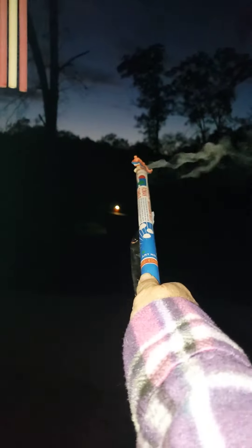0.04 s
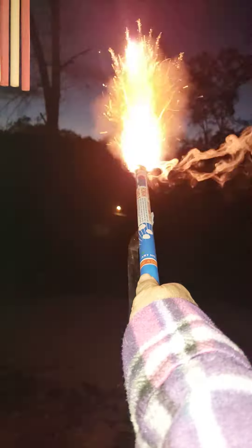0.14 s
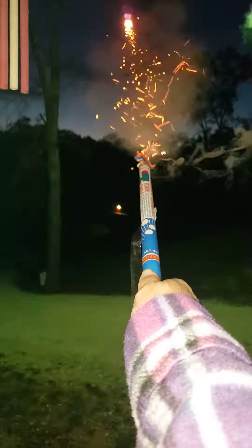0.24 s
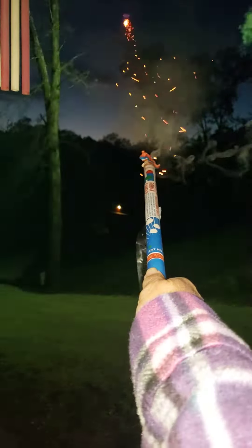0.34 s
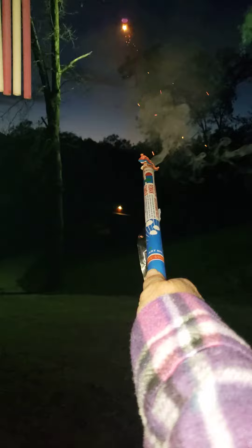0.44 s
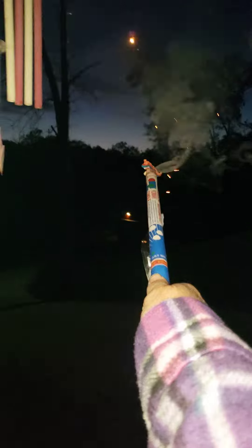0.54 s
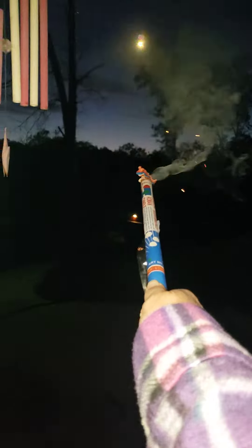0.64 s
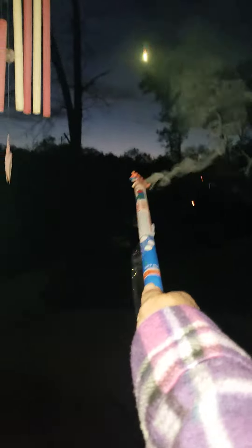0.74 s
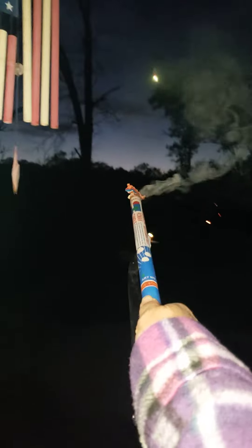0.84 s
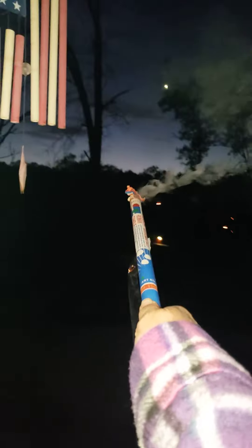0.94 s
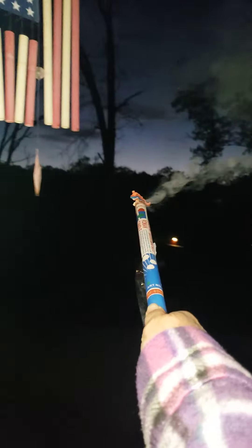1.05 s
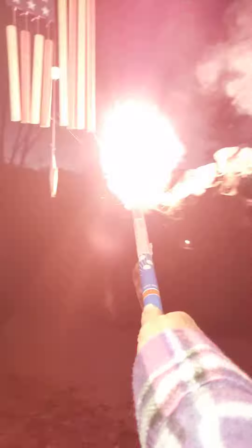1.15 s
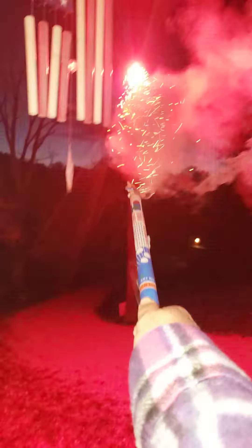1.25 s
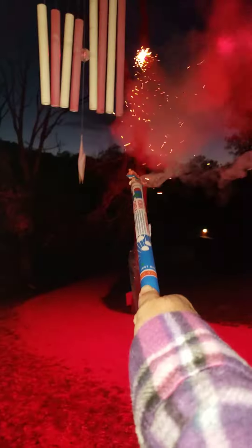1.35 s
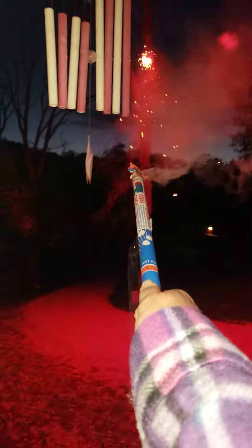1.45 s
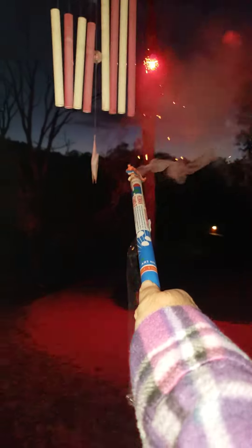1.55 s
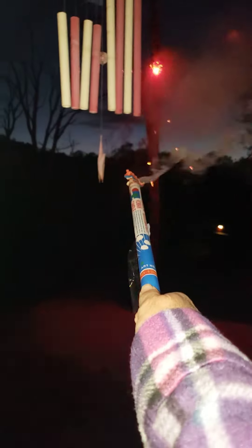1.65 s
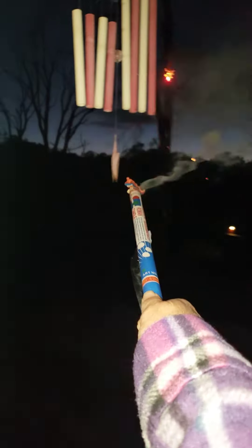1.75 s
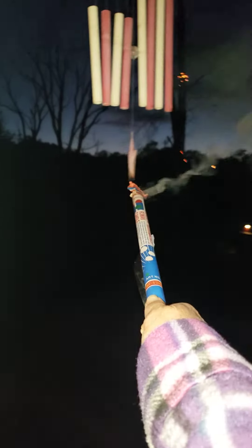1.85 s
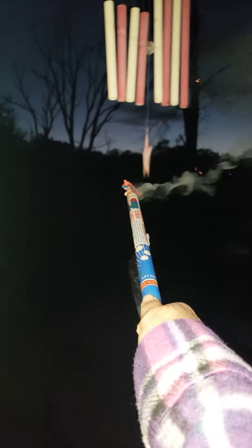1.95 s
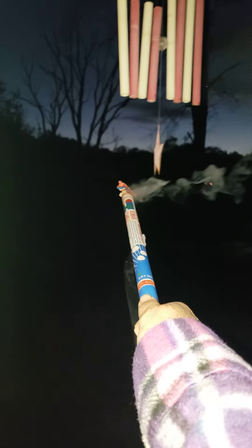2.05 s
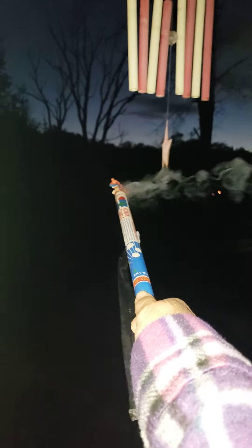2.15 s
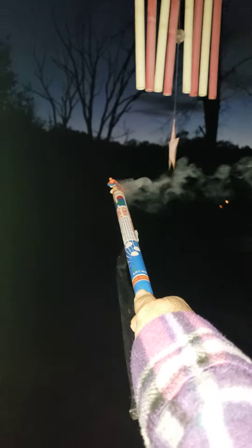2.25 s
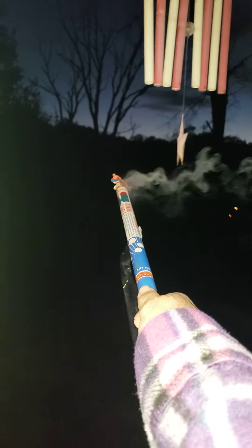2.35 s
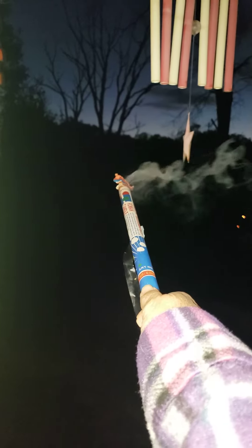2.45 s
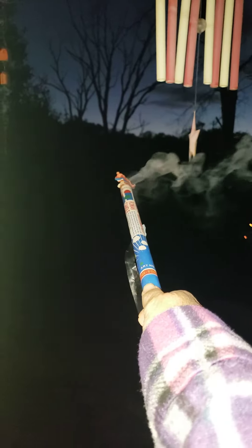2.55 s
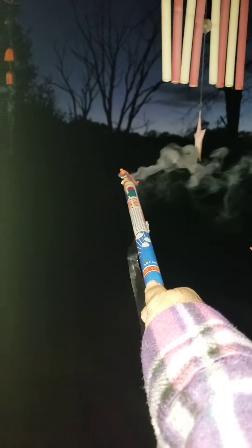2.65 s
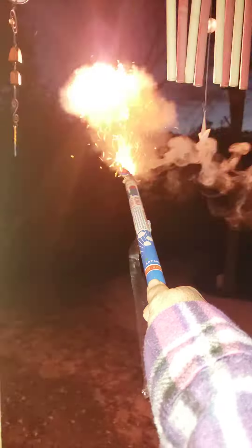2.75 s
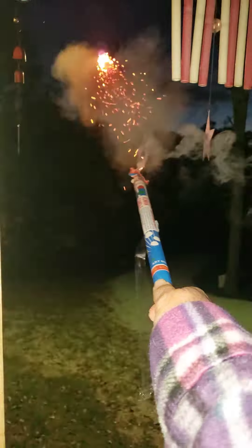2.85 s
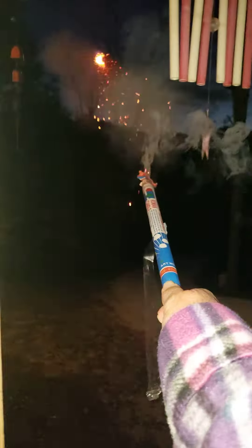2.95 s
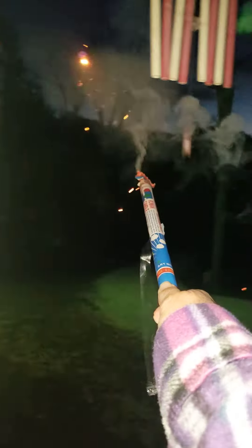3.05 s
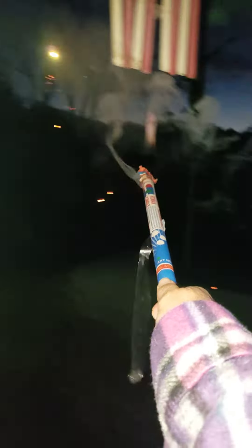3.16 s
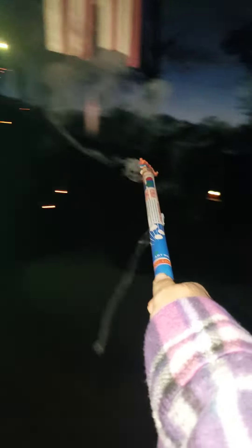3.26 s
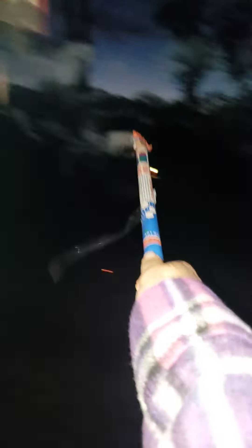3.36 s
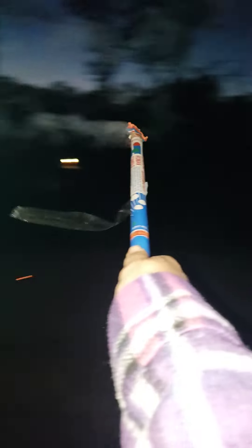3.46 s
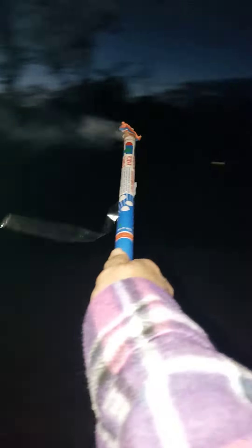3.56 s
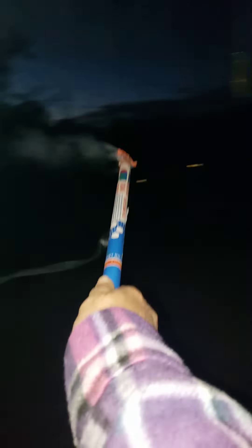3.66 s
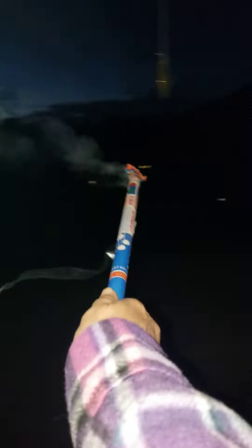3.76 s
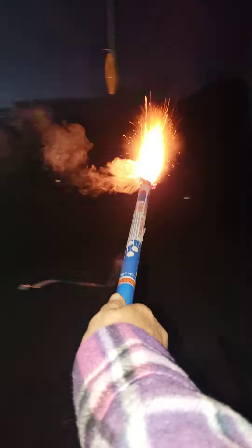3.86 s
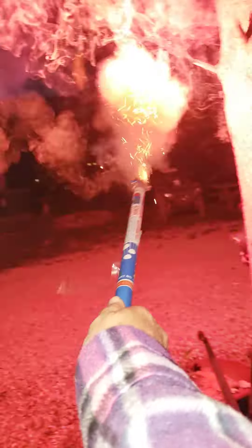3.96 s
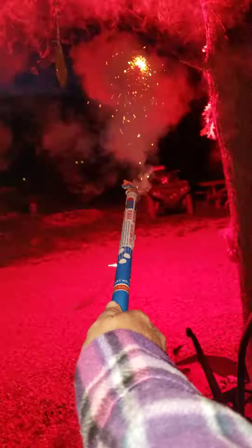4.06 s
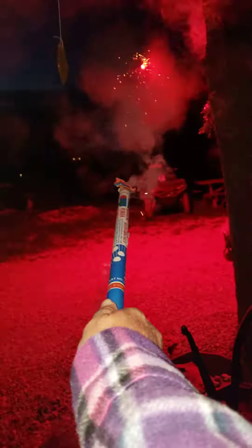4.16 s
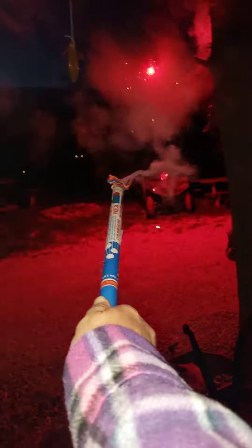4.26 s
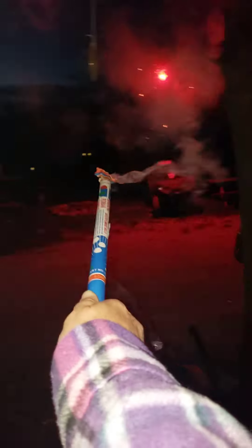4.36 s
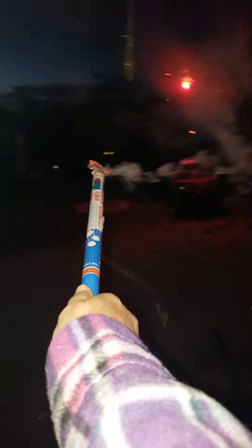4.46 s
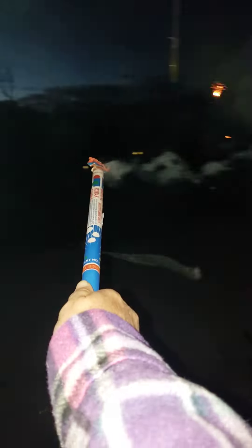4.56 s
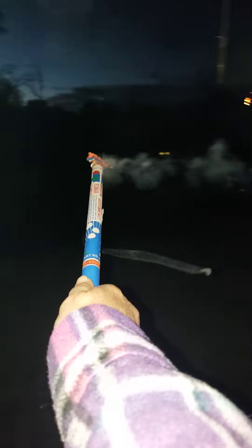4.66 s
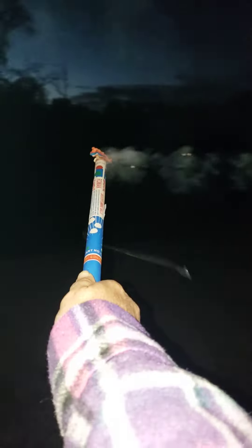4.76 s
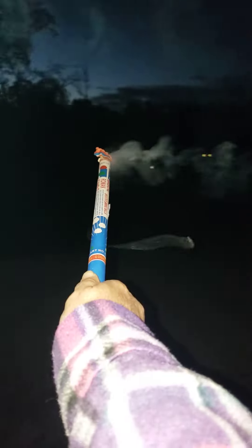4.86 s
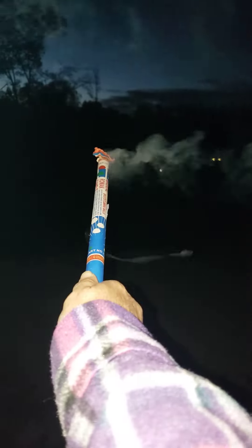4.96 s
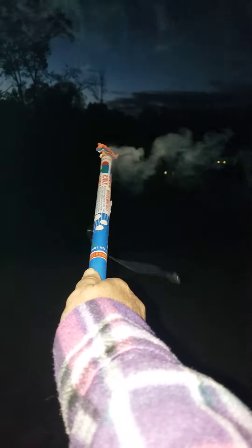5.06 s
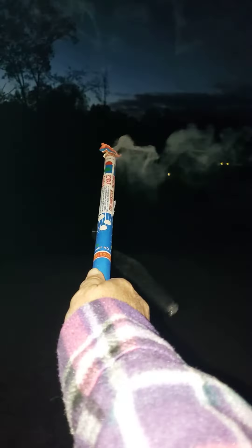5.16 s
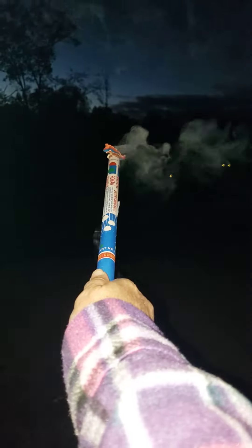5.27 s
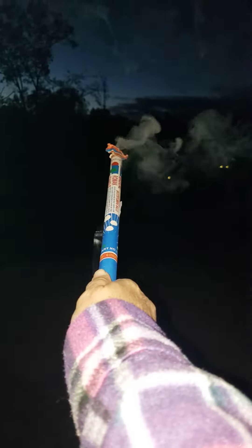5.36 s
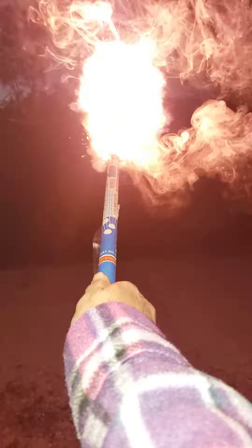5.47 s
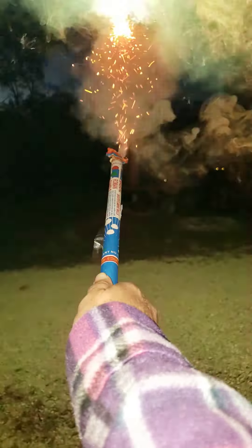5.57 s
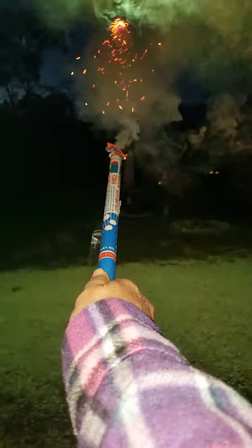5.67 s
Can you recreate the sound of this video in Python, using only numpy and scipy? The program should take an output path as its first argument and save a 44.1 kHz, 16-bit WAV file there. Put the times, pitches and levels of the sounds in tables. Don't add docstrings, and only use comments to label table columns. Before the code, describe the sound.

A handheld firework tube hisses steadily outdoors at night and fires five sharp, booming pops at uneven intervals, each with a short echo.

```python
import sys
import numpy as np
from scipy import signal
from scipy.fft import rfft, irfft, next_fast_len
from scipy.io import wavfile

SR = 44100
rng = np.random.default_rng(int(sys.argv[2]) if len(sys.argv) > 2 else 0)


def to_wav(s):
    ch = np.atleast_2d(s).T
    pcm = np.round(np.clip(ch, -1, 1) * 32767)
    wavfile.write(sys.argv[1], SR, pcm.astype(np.int16))


def invert_db(x):
    u = np.asarray(x, float) / 20
    return 10 ** u


N = 252711
TIME_S = np.arange(N) / SR
SIDE = np.array([[.5], [-.5]])

# ignition_s, jet_open_s, ball_out_s
SHOTS = [
    (.1655, .1735, .1830),
    (1.1610, 1.1715, 1.1920),
    (2.7160, 2.7260, 2.7500),
    (3.8925, 3.9020, 3.9260),
    (5.4460, 5.4565, 5.4825),
]
# frequency_hz, left_right_db
PORT_SHADING = [(60, -1.5), (300, -2), (700, .5), (1300, -4), (2400, -4), (4400, -3.5), (8000, 5.5),
                (13000, 4.5)]


def at_hz(points, hz):
    corner_hz, value = np.transpose(points)
    return np.interp(np.log(np.maximum(hz, 1)), np.log(corner_hz), value)


def in_time(rows):
    s, value = np.transpose(rows)
    return np.interp(TIME_S, s, value)


def swells(rows):
    return sum(db * np.cos(np.pi * np.clip((TIME_S - s) / length, -.5, .5)) ** 2 for s, length, db in rows)


def gate(start, end, fade):
    outside = np.maximum(np.maximum(start - TIME_S, TIME_S - end), 0)
    return invert_db(-30 * outside / fade)


def rms_one(x):
    return x / np.sqrt(np.mean(x ** 2) + 1e-20)


def band(x, order, hz, kind):
    return signal.sosfiltfilt(signal.butter(order, hz, kind, fs=SR, output="sos"), x)


def noise(spectrum, channels=1):
    size = next_fast_len(N)
    hz = np.fft.rfftfreq(size, 1 / SR)
    white = rfft(rng.standard_normal((channels, size)))
    return rms_one(irfft(white * invert_db(at_hz(spectrum, hz)), size)[:, :N])


def drift(rate):
    r = np.exp(-2 * np.pi * rate / SR)
    return rms_one(signal.lfilter([1], [1, -2 * r, r * r], rng.standard_normal(N + SR))[SR:])


def resonant_noise(hz, width_hz, narrow):
    white = rng.standard_normal((3, N)) + 1j * rng.standard_normal((3, N))
    turn = np.exp(2j * np.pi * np.cumsum(hz) / SR)

    def ring(width):
        r = np.exp(-np.pi * width / SR)
        return rms_one((signal.lfilter([1], [1, -2 * r, r * r], white) * turn).real)

    narrow = np.clip(narrow, 0, 1)
    return (1 - narrow) * ring(width_hz) + narrow * ring(width_hz / 3)


def ports(x, pan_db):
    # frequency_hz, level_db
    scattered = [(100, -36), (500, -6.5), (1200, -4), (4000, 0.5), (10000, 5.5)]
    lag_s = 0.00013
    size = next_fast_len(N)
    hz = np.fft.rfftfreq(size, 1 / SR)
    x = rfft(x, size)
    direct = x[0] * np.exp(2j * np.pi * hz * SIDE * lag_s)
    both = direct + x[1:] * invert_db(at_hz(scattered, hz))
    return irfft(both * invert_db(SIDE * at_hz(PORT_SHADING, hz)), size)[:, :N] * invert_db(SIDE * pan_db)


def blast(s, db, push_ms, soft):
    u = np.arange(2000) / SR / (push_ms / 1000)
    rounding = np.hanning(3 + int(soft * push_ms / 1000 * SR))
    wave = np.convolve((1 - u) * np.exp(-.7 * u), rounding)[:2000]
    out, at = np.zeros(N), round(s * SR)
    out[at:at + 2000] = invert_db(db) * wave / wave.max()
    return out


def vigour():
    # time_s, level_db
    burn_rate = [(0.0, -66.5), (0.4, -68), (1.0, -71), (1.17, -72.5), (1.32, -68.5), (1.84, -67),
                 (2.14, -71.5), (2.46, -69), (2.6, -66.5), (2.9, -63.5), (3.3, -63.5), (3.85, -64.5),
                 (4.06, -59.5), (4.45, -62), (5.27, -67.5), (5.45, -68.5), (5.73, -61.5)]
    return in_time(burn_rate)


def vigour_swing():
    return vigour() - vigour().mean()


def stall():
    start, end = 2.322, 2.454
    return in_time([(start - .01, 0), (start, 1), (end - .004, 1), (end, 0)])


def afterglow():
    decay_s = 0.26
    return sum((TIME_S > out) * np.exp(-np.maximum(TIME_S - out, 0) / decay_s) for _, _, out in SHOTS)


def spark_showers():
    # middle_s, length_s, level_db
    showers = [
        (0, .2, -12),
        (.5, 0.51, 0.5),
        (1.05, 0.45, -6.5),
        (2.05, 0.76, 2),
        (3.5, 1, 3.5),
        (3.89, 0.34, -2),
        (4.2, 1, -3),
        (4.7, 0.93, 2.5),
        (5.3, 1, 3),
    ]
    return swells(showers)


def night_murmur():
    # frequency_hz, density_db
    murmur = [(25, -9), (60, -10), (120, -9.5), (220, -2.5), (350, -6), (600, -11), (1500, -15.5),
              (5000, -34)]
    # middle_s, length_s, level_db
    gusts = [
        (0, 0.9, 6),
        (.68, .2, 4),
        (1.99, 0.41, -5),
        (2.55, 0.18, 6),
        (3.53, 0.41, 9.5),
        (3.87, 0.32, -8),
        (4.6, 0.69, 4),
    ]
    level_db = -71 + 0.21 * vigour_swing() + 6.5 * afterglow() + swells(gusts)
    own, shared = noise(murmur, channels=2), noise(murmur)
    return (0.61 * own + 1.25 * shared) * invert_db(level_db + 2.0 * drift(16.0) + np.array([[-2.5], [2.5]]))


def far_hum():
    # start_s, end_s, pitch_hz, width_hz, level_db
    hums = [(0.606, 0.658, 180, 25, -65.5), (1.875, 1.97, 445, 24.8, -71), (2.3, 2.5, 429, 25, -71.5),
            (3.247, 3.35, 320, 25, -70)]
    return sum(resonant_noise(np.full(N, hz), width_hz, 0)[0] * invert_db(db) * gate(start, end, 0.051)
               for start, end, hz, width_hz, db in hums)


def far_thud():
    thud = blast(2.3625, db=-41.5, push_ms=0.76, soft=4.0)
    return signal.sosfilt(signal.butter(2, 70, "high", fs=SR, output="sos"), thud)


def rim_whistles():
    # start_s, end_s, pitch_hz, width_hz, level_db
    edge_tones = [(0.647, 0.73, 2870, 450, -69), (1.447, 1.762, 3000, 563, -69),
                  (4.05, 4.33, 3620, 150, -69), (4.48, 4.928, 3024, 504, -60)]
    out = 0
    for start, end, hz, width_hz, db in edge_tones:
        arch_db = swells([((start + end) / 2, end - start, 5)])
        out = out + invert_db(db + arch_db) * gate(start, end, .06) * resonant_noise(np.full(N, hz), width_hz, 0)
    return out


def spark_sizzle():
    # frequency_hz, density_db
    crackle = [(3000, -14.5), (5500, -3), (7000, -5), (8300, -8.5), (11000, -3.5), (13500, -8.5),
               (15500, -3.5)]
    showers_db = spark_showers()
    level_db = -62 + 0.46 * vigour_swing() + showers_db - 6 * stall()
    sizzle = noise(crackle, channels=2) * invert_db(level_db + .6 * drift(20) + np.array([[1.7], [-1.7]]))
    coarse = band(sizzle, 2, 8500, "low")
    return sizzle + (invert_db(0.76 * showers_db) - 1) * coarse


def free_hiss():
    # frequency_hz, density_db
    mixing = [(300, -35), (900, -11), (1400, -4), (2800, -0.5), (4500, -4), (6500, -15.5), (9000, -19.5),
              (16000, -26)]
    level_db = -63 + 0.87 * vigour_swing() + 0.5 * afterglow() + 0.31 * spark_showers() - 10 * stall()
    return noise(mixing, channels=3) * invert_db(level_db + 1.4 * drift(36))


def tube_column():
    modes = [(.305, 404, -1), (1.0, 528, 1.5), (1.69, 542, -6.5), (2.352, 586, -15.5), (3.0, 684, -22.5)]
    start_hz, growth_per_s = 2626, .072
    leap = invert_db(swells([(3.6, .3, .5)]))
    column_hz = start_hz * leap / (1 + growth_per_s * TIME_S)
    narrow = 0.21 * (TIME_S - 2.3)
    ringing = sum(invert_db(db + drift(5)) * resonant_noise(k * column_hz, width_hz, narrow)
                  for k, width_hz, db in modes)
    return ringing * invert_db(vigour() - 10 * stall() + 0.5 + 0.85 * drift(36))


def burn():
    # time_s, left_right_db
    aim = [(0, -2.5), (.5, 0), (1.0, -4.5), (1.3, 0), (2.4, -3), (2.9, -0.5), (5.73, 0.5)]
    return ports(tube_column() + rim_whistles() + free_hiss(), in_time(aim)) + spark_sizzle()


def echoes(x):
    # frequency_hz, t60_s
    decay = [(55, 0.69), (110, .3), (200, 0.31), (600, 0.23), (2000, 0.24), (5000, 0.19), (12000, 0.2)]
    # frequency_hz, level_db
    colour = [(50, -13.5), (200, -7.5), (600, -2.5), (2000, -5), (5000, -0.5), (12000, 0)]
    t, edges = np.arange(SR) / SR, 40 * 2 ** np.arange(0, 9.1, .5)
    white = rng.standard_normal((2, 3, SR))
    tail = 0
    for k, (low, high) in enumerate(zip(edges, edges[1:])):
        sos = signal.butter(2, [low, min(high, .45 * SR)], "band", fs=SR, output="sos")
        mid, *own = signal.sosfilt(sos, white[k % 2])
        hz = np.sqrt(low * high)
        alike = 1 / (1 + (hz / 900) ** 2)
        t60_s = at_hz(decay, hz)
        dying = invert_db(-60 * t / t60_s) + invert_db(-23.0 - 60 * t / (2.97 * t60_s))
        shade = invert_db(SIDE * at_hz(PORT_SHADING, hz) + at_hz(colour, hz))
        clumps = invert_db(2.1 * drift(44)[:SR])
        tail = tail + shade * clumps * dying * (np.sqrt(alike) * mid + np.sqrt(1 - alike) * np.array(own))
    tail = tail * np.minimum(t / 0.017, 1) * invert_db(-36)
    slap_s = .062
    slap = np.interp(t, [slap_s - 1 / SR, slap_s, slap_s + 1 / SR], [0, invert_db(-19.5), 0])
    tail = tail + signal.sosfilt(signal.butter(2, [150, 560], "band", fs=SR, output="sos"), slap)
    return signal.fftconvolve(x[None], tail, axes=1)[:, :N]


def recoil_booms():
    # start_s, pitch_hz, level_db, left_right_db
    kicks = [(0.179, 64, -12.5, -6), (1.188, 110, -28.5, -0.5), (2.741, 68, -19, 4), (3.911, 60, -21.5, 0),
             (5.4700, 66, -15, 0.5)]
    rise_s, decay_db_per_s = 0.0087, 730
    out = np.zeros((2, N))
    for s, hz, db, side_db in kicks:
        late = np.maximum(TIME_S - s, 0)
        level = invert_db(db + 5.5 - decay_db_per_s * late + SIDE * side_db)
        out += (1 - np.exp(-late / rise_s)) * level * np.sin(2 * np.pi * hz * late)
    return out


def pressure_pops():
    # start_s, peak_db, push_ms
    releases = [(.1775, -4, .12), (.1779, 3, .13), (1.1668, -16, .3), (1.1879, -4, .45), (2.7311, -8, .12),
                (2.7429, -2, .45), (3.9020, -4, .2), (3.9096, -8, .2), (3.9155, -6, .12), (3.9232, -11, .5),
                (5.4565, -1, .2), (5.4726, -9, .6), (5.4774, -8, .3), (5.4813, -5, .6)]
    return sum(blast(*pop, soft=0.55) for pop in releases)


def jets():
    # frequency_hz, density_db
    turbulence = [(35, -23.5), (60, -0.5), (300, -0.5), (630, 0), (1050, -2.5), (1500, -2.5), (2450, -2),
                  (3200, -7.5), (4500, -9), (6500, -19), (8100, -27.5), (9500, -23.5), (12500, -21.5),
                  (15500, -21.5)]
    # jet_db, bass_db, middle_db, treble_db, opening_db
    charges = [
        (-19.5, 6.5, -1, 6, -2.5),
        (-17, 1.5, 0, -2, -4),
        (-16, -0.5, 0, 1, -4),
        (-15.5, 2.5, -2.5, -0.5, 1.5),
        (-13, 2, 1.5, 3.5, -6),
    ]
    # first_puff_db under the jet, left_right_db, echo_db, collapse_s
    facing = [
        (-5, -0.5, 6, 0.15),
        (-10.5, -2, -2.5, 0.088),
        (-8, 0.5, 3.5, 0.09),
        (-3, -0.5, 0.5, 0.086),
        (-11.5, 2, -1.5, 0.052),
    ]
    gas = noise(turbulence, channels=3) * invert_db(1.8 * drift(500))
    bass = band(gas, 2, 350, "low")
    middle = band(gas, 2, [300, 1300], "band")
    treble = band(gas, 2, 5000, "high")
    out, pan_db, wet_db = np.zeros((3, N)), np.zeros(N), np.zeros(N)
    for (lit, opened, free), charge, (puff_db, side_db, echo_db, collapse) in zip(SHOTS, charges, facing):
        db, bass_db, middle_db, treble_db, open_db = charge
        steps = [lit - .008, lit, lit + .006, opened - .0007, opened, free, free + collapse]
        shape = np.interp(TIME_S, steps, [-60, -36, puff_db, puff_db, open_db, 0, -60])
        fast = invert_db(treble_db + 0.33 * shape)
        coloured = gas + (invert_db(bass_db) - 1) * bass + (invert_db(middle_db) - 1) * middle + (fast - 1) * treble
        blowing = (TIME_S > steps[0]) * (TIME_S < steps[-1])
        out += invert_db(db + shape) * blowing * coloured
        onward = TIME_S > lit - .1
        pan_db[onward], wet_db[onward] = side_db, echo_db
    return out, pan_db, wet_db


def shots():
    jet, pan_db, wet_db = jets()
    jet[0] += pressure_pops()
    booms = recoil_booms()
    outward = (jet[0] + .4 * booms.mean(axis=0)) * invert_db(wet_db)
    return ports(jet, pan_db) + booms, outward


def scene():
    thud = far_thud()
    background = night_murmur() + far_hum() + thud * invert_db(np.array([[-1.5], [1.5]]))
    fired, outward = shots()
    return background + burn() + fired + echoes(outward + .5 * thud)


def roll_off(x):
    return signal.sosfilt(signal.butter(12, 16580, fs=SR, output="sos"), x)


def record(dry):
    dry = signal.sosfilt(signal.butter(2, 40, "high", fs=SR, output="sos"), dry)
    rounded = 1.3 * np.tanh(dry / 1.3)
    mix = signal.sosfilt(signal.cheby2(16, 45, 16050, fs=SR, output="sos"), rounded)
    return roll_off(mix)


dry = scene()
out = record(dry)
to_wav(out)
```